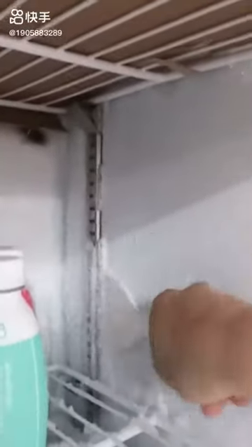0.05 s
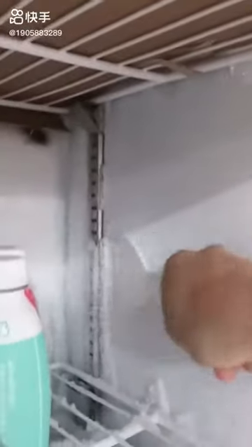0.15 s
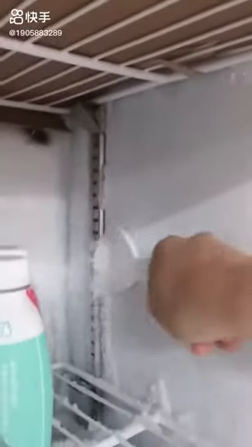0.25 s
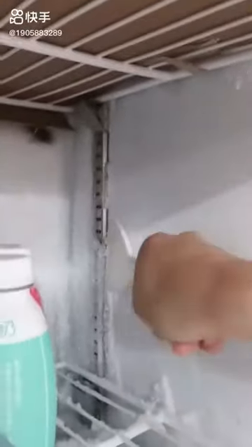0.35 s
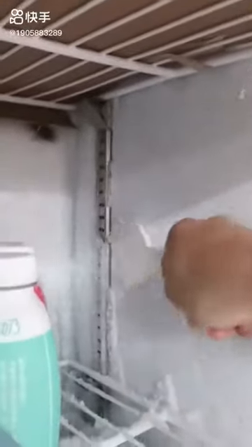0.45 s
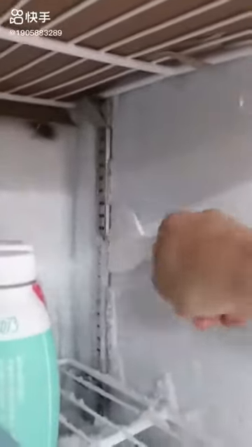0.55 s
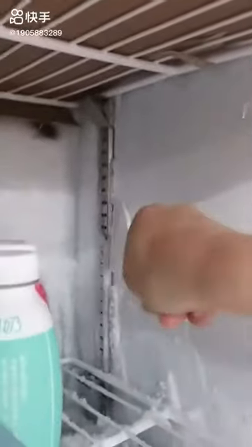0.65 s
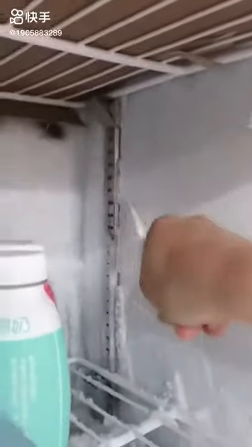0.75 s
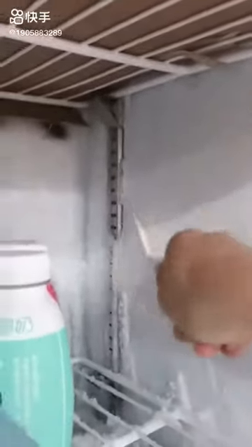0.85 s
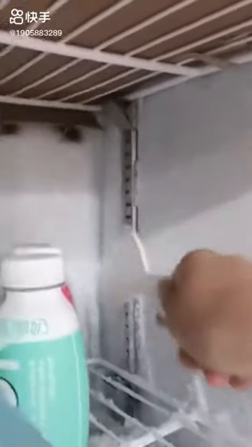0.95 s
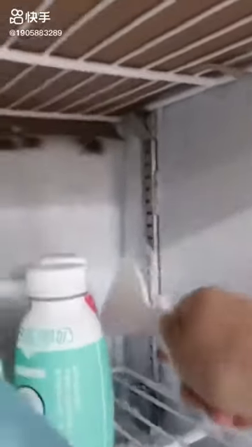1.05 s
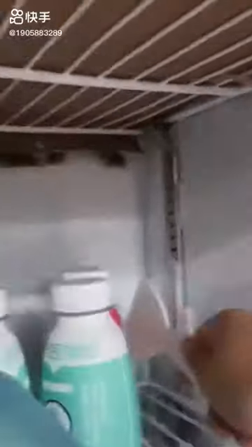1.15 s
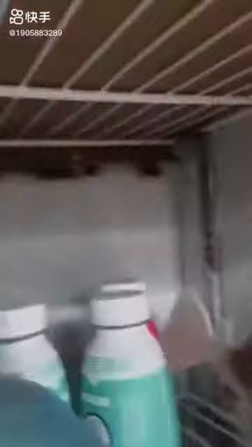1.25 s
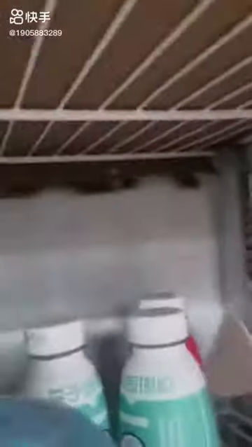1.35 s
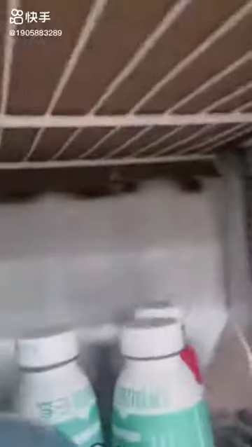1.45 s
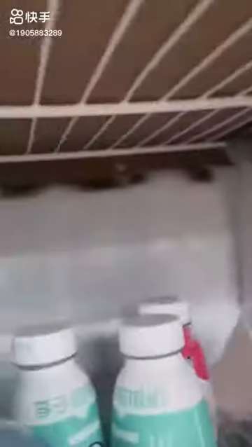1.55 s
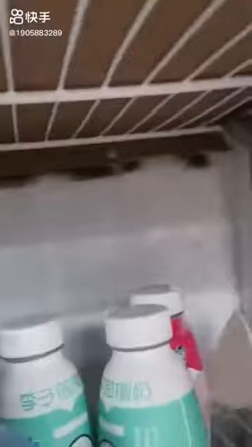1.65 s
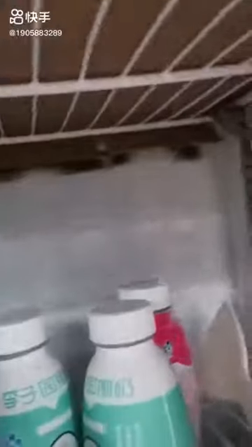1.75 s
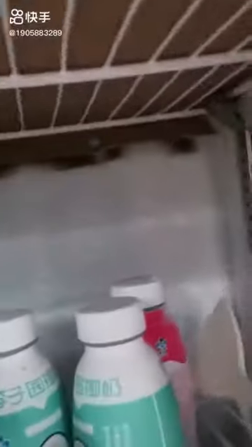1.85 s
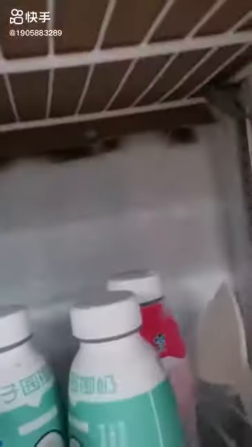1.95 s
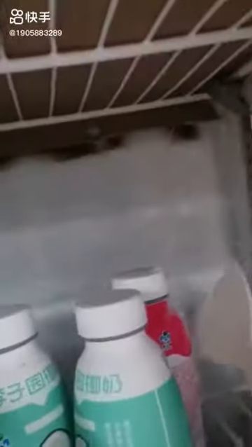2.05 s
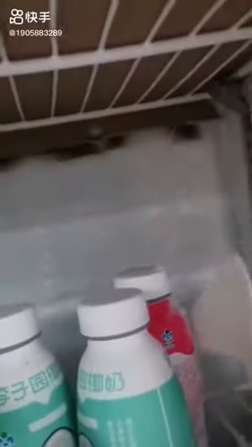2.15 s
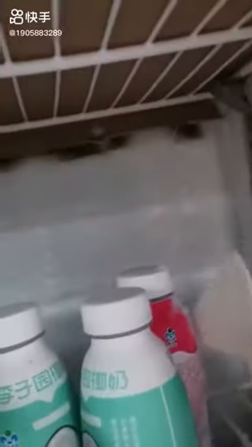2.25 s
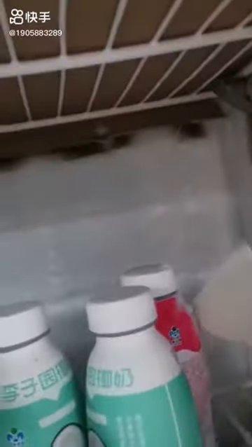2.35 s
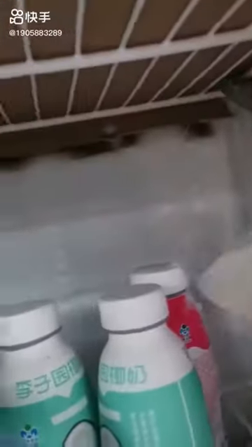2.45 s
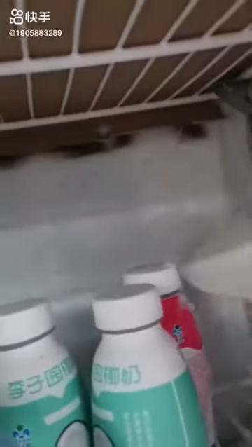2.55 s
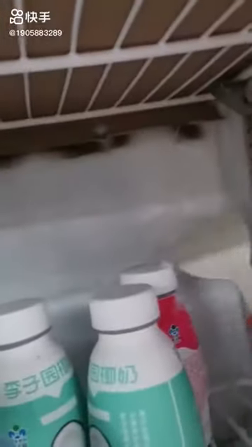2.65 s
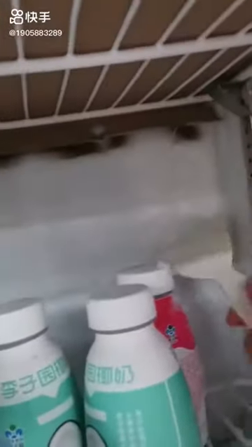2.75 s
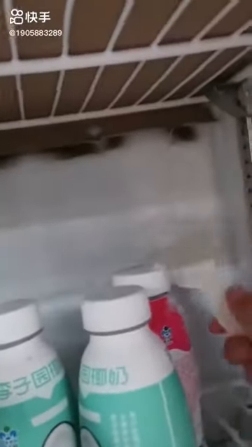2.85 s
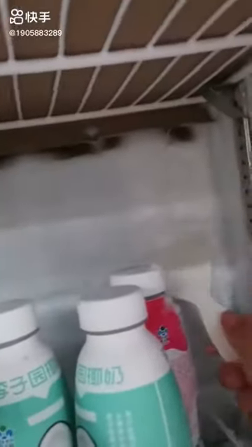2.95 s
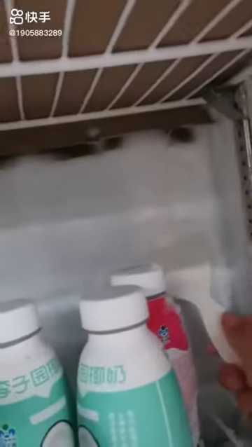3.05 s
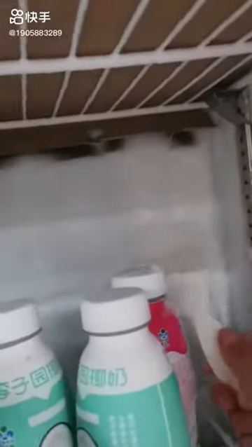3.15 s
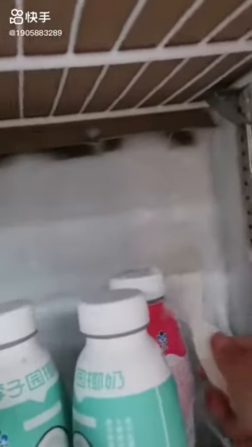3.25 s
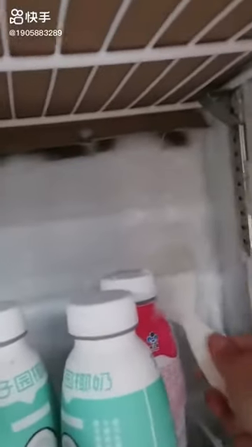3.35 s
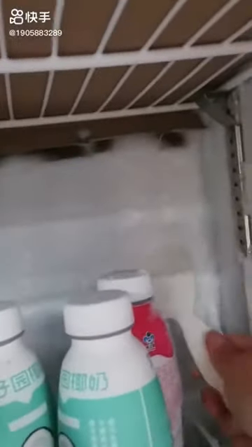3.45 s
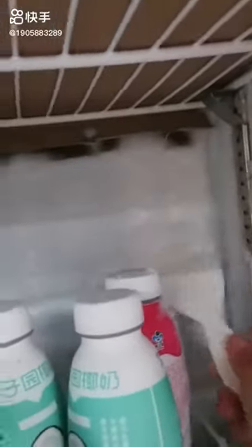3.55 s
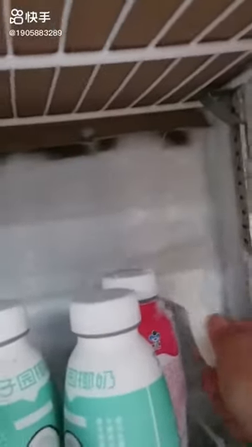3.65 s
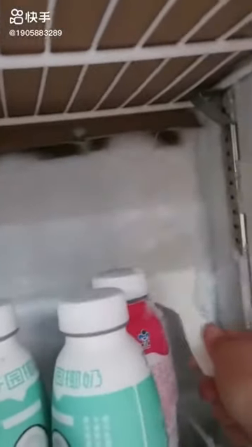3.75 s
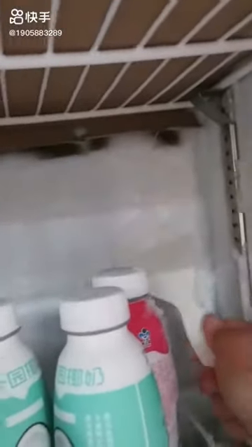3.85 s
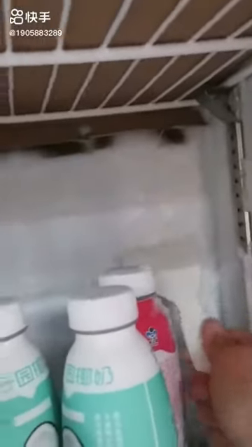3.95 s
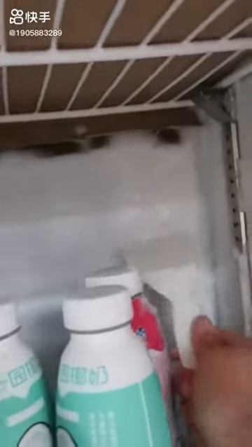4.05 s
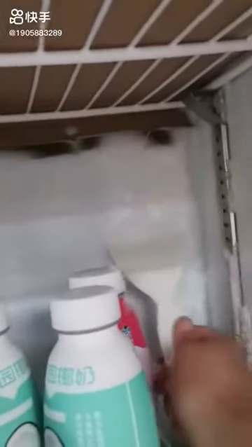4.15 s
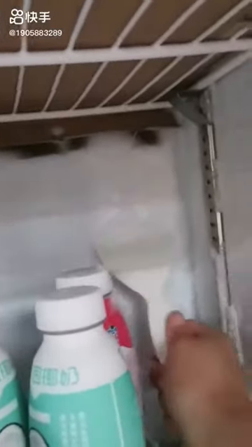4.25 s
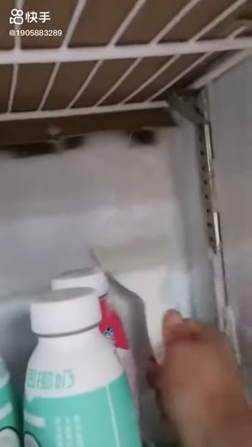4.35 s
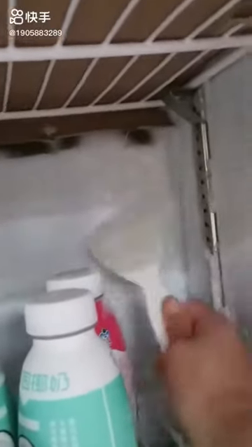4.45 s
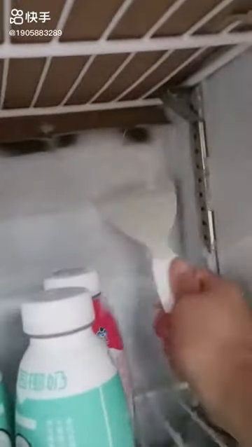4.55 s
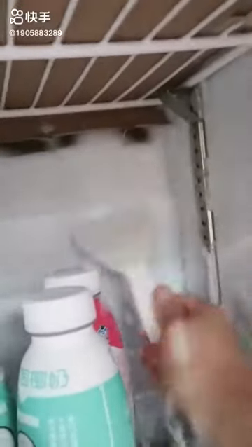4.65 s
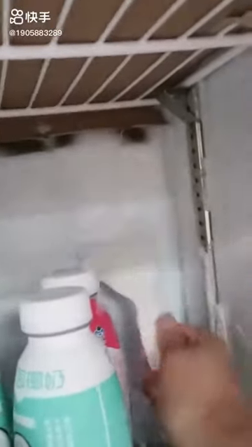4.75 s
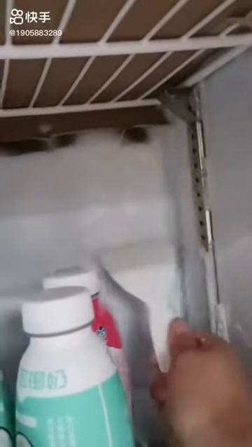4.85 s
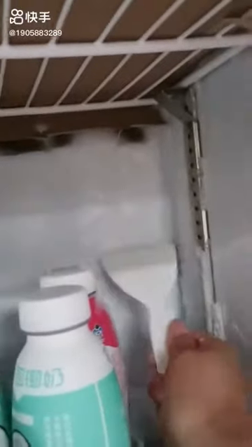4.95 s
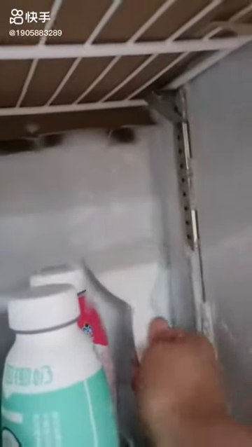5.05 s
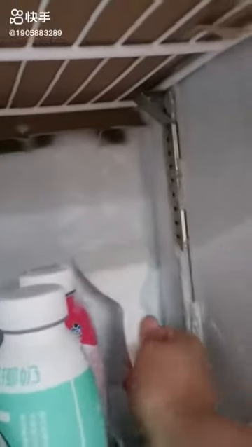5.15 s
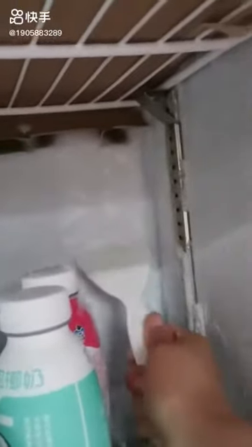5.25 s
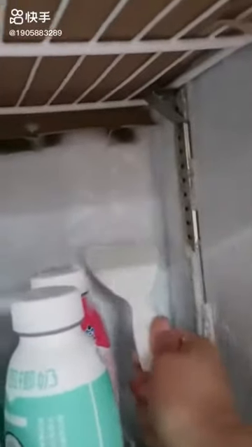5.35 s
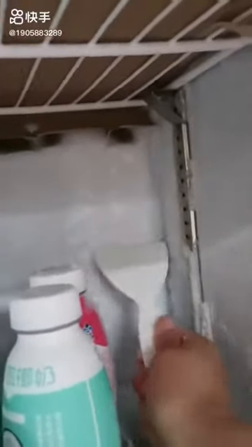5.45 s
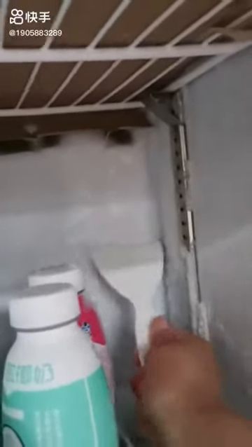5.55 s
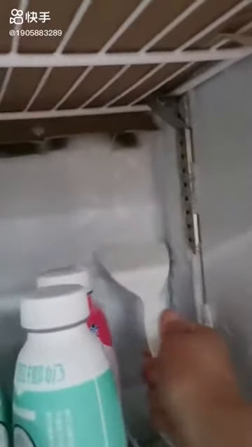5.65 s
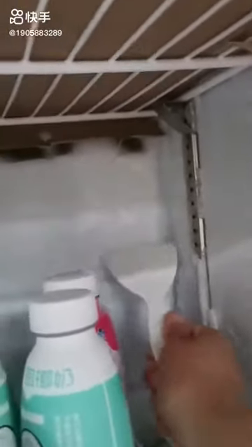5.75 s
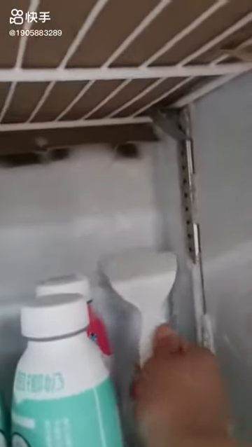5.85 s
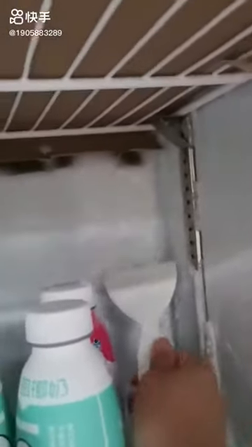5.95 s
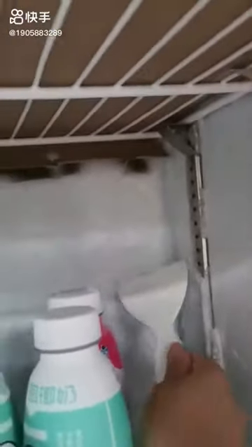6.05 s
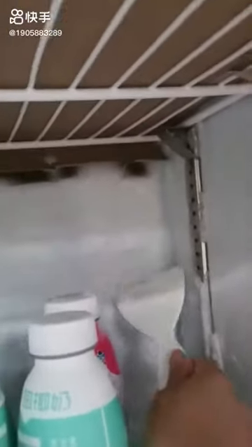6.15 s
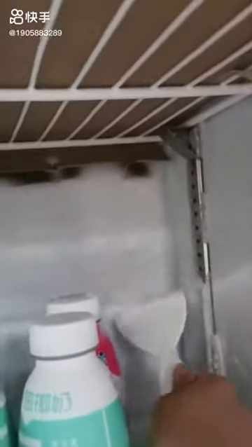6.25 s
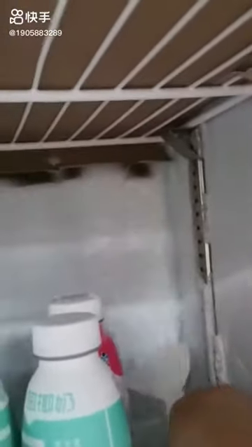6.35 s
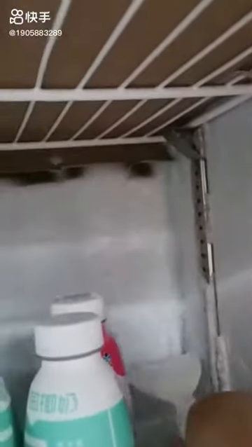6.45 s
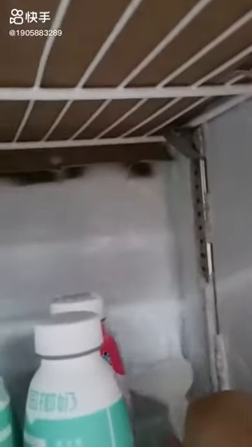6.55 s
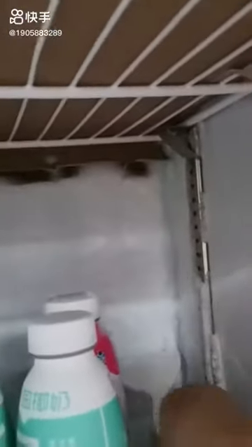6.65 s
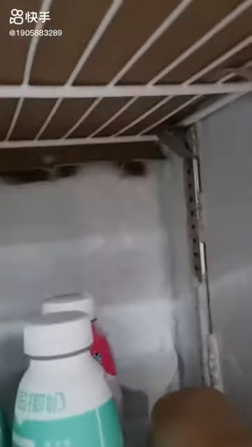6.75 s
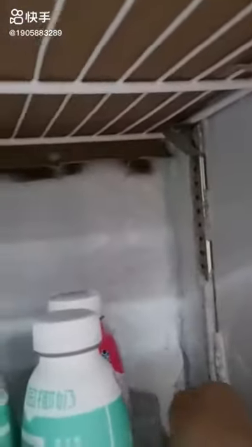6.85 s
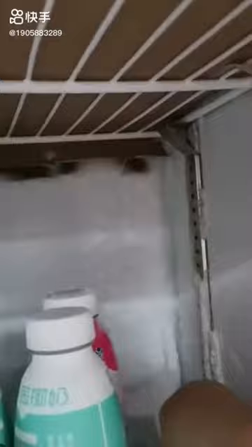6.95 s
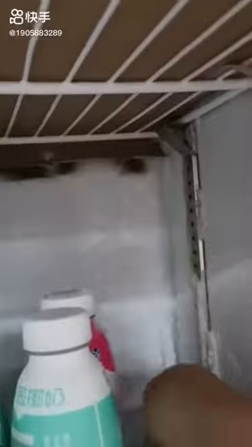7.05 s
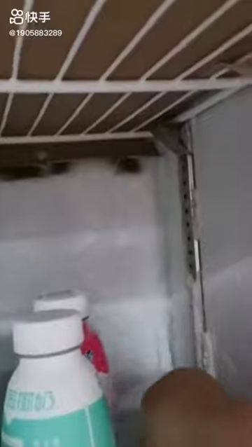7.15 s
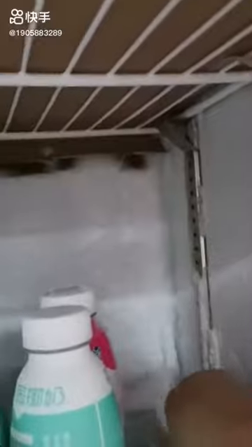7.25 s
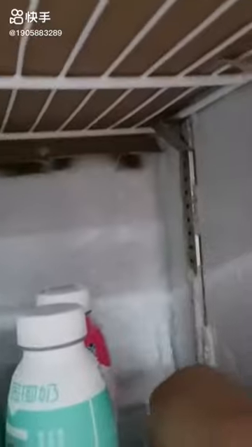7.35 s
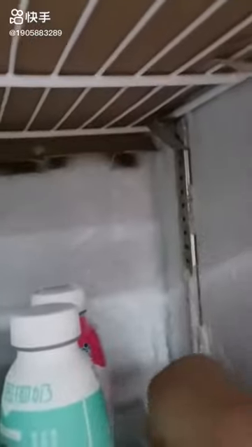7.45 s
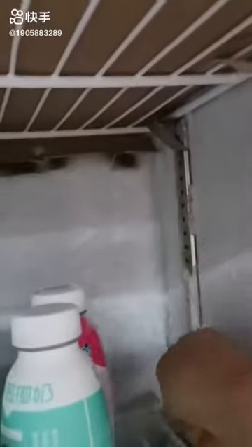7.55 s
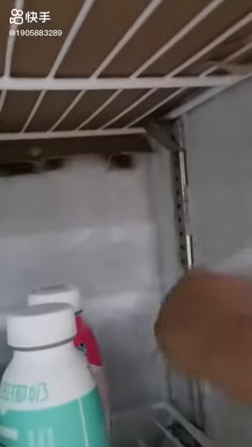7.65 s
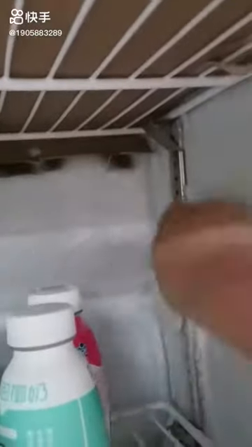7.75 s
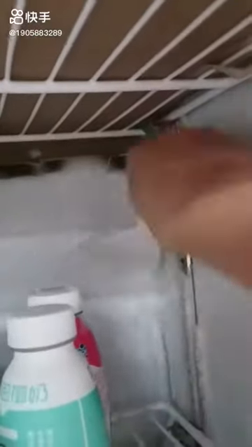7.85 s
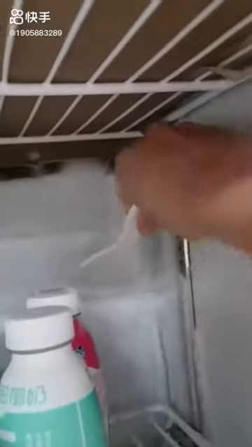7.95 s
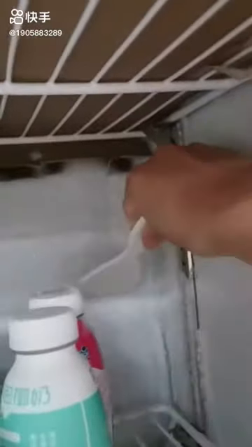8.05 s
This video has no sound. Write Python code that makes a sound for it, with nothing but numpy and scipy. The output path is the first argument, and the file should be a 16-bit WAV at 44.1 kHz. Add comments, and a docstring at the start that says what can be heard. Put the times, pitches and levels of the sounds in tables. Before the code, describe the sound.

Crunchy scraping of ice in a freezer: a short burst, a quiet humming pause, then rapid harsh strokes with cracks, clacks and hollow knocks.

```python
"""A plastic scraper is pushed in quick strokes over thick frost inside a freezer.
Dense random showers of breaking ice crystals excite crackling ice, a ringing blade and a drumming hollow wall.
Lumps snap off in short bursts of cracks, and the blade squeaks where its slips lock to a bending mode.
Hard ridges stop the blade and excite decaying modes of the wall; a short reverberation follows all of these.
Underneath, the compressor hums in beating sine lines, with a rush and a thin hiss of filtered noise."""
import sys
import numpy as np
from scipy import signal
from scipy.fft import rfft, irfft, next_fast_len
from scipy.io import wavfile
from scipy.ndimage import uniform_filter1d, minimum_filter1d

SR = 44100
rng = np.random.default_rng(int(sys.argv[2]) if len(sys.argv) > 2 else 0)


def put_to_file(sound):
    """Save the sound as 16-bit audio at rate SR, in the file named by the first command-line argument."""
    columns = np.atleast_2d(sound).T  # one column per channel
    safe = np.clip(columns, -1, 1)
    whole_steps = np.round(safe * 32767)
    wavfile.write(sys.argv[1], SR, whole_steps.astype(np.int16))


N = 357210
TIME = np.arange(N) / SR  # s

# pushes of the blade: (start [s], length [s], relative level of ice crackle [dB], of blade rasp [dB],
# of wall rumble [dB], swell from start to end [dB], mean pitch of the bent blade [Hz])
PUSHES = [(0.036, 0.18, -18, -26.5, -31, -1.5, 2040), (0.185, 0.06, -13.5, -21.5, -24.5, 0, 2050),
          (0.264, 0.061, -34, -44, -38, -3, 2070), (0.387, 0.048, -20, -25.5, -32.5, 3.5, 1890),
          (0.461, 0.064, -19.5, -24, -26, 17.5, 1900), (0.636, 0.0043, -33.5, -60, -56, -2, 1430),
          (0.781, 0.0062, -28.5, -42.5, -49, -2, 1870), (0.833, 0.026, -44.5, -55.5, -54.5, -4, 1670),
          (1.053, 0.025, -46.5, -43, -53, 4, 1320), (1.1, 0.05, -74, -62, -62, -4, 1110),
          (1.186, 0.014, -72, -58.5, -58, -2, 1020), (1.422, 0.014, -53, -55.5, -57, -1, 1510),
          (1.46, 0.071, -78, -63.5, -63.5, -2, 950), (2.832, 0.052, -21, -18, -20, 4, 1320),
          (2.914, 0.024, -24.5, -24.5, -28, 7, 2100), (3.136, 0.032, -14.5, -14, -23.5, -16.5, 1770),
          (3.178, 0.11, -21.5, -16.5, -17, -1.5, 1630), (3.442, 0.047, -30, -26.5, -40.5, 15, 1530),
          (3.63, 0.047, -22.5, -18.5, -19, -5, 1460), (3.698, 0.019, -30.5, -29.5, -40, 1, 1270),
          (3.861, 0.05, -27, -28.5, -39.5, 8.5, 1380), (4.057, 0.068, -24, -25, -18, -16.5, 1660),
          (4.145, 0.049, -28, -23.5, -20.5, -0.5, 1490), (4.297, 0.056, -56, -56, -55, 3, 1580),
          (4.413, 0.045, -15, -15.5, -15, -0.5, 1530), (4.524, 0.11, -41.5, -55, -65, 14.5, 1500),
          (4.661, 0.062, -19.5, -18.5, -24.5, -1.5, 1460), (4.738, 0.1, -20.5, -28.5, -34, 15.5, 1720),
          (4.876, 0.13, -28.5, -31, -44, -11, 1004), (4.989, 0.08, -25, -16, -16.5, -7.5, 1280),
          (5.069, 0.084, -39.5, -31.5, -31.5, -2.5, 1210), (5.244, 0.004, -28, -18.5, -24, -5, 1880),
          (5.292, 0.012, -16, -20, -35, -9.5, 1370), (5.42, 0.1, -22, -18.5, -17.5, -1.5, 1110),
          (5.563, 0.15, -42, -35, -41, -5, 1640), (5.756, 0.11, -38.5, -35.5, -44.5, -13, 1580),
          (5.884, 0.031, -32, -32.5, -44, 10, 1460), (6.014, 0.0055, -14.5, -14, -25, 0, 1770),
          (6.121, 0.0099, -13, -15, -28.5, -5.5, 1780), (6.16, 0.075, -15.5, -18.5, -26, 6.5, 1570),
          (6.266, 0.075, -15.5, -22.5, -36, -8.5, 1420), (6.394, 0.086, -30.5, -31.5, -42, -4.5, 1750),
          (6.506, 0.047, -32, -40, -57, -4, 2110), (6.586, 0.059, -18, -16.5, -27.5, 5, 1690),
          (6.646, 0.15, -44.5, -29, -28.5, -1.5, 1200), (6.814, 0.035, -21.5, -24, -27.5, 2.5, 1320),
          (6.982, 0.015, -12, -12, -17, 4, 1560), (7.046, 0.004, -15.5, -20, -24, 0, 2240),
          (7.204, 0.072, -28.5, -24.5, -38.5, -3.5, 2000), (7.334, 0.018, -29, -25.5, -27.5, -2, 1600),
          (7.404, 0.043, -30, -36, -35.5, 21.5, 2200), (7.498, 0.17, -16.5, -18.5, -25, -7.5, 1520),
          (7.717, 0.048, -16, -17, -26.5, 2.5, 1910), (7.78, 0.277, -36, -42.5, -52.5, -11.5, 1940),
          (8.076, 0.016, -24.5, -19.5, -23, -1.5, 2080)]
# the largest lumps of ice snapping off: (time [s], relative peak level in the blade [dB],
# crackle relative to the blade before a common trim [dB], pitch of the blade [Hz])
LUMPS = [(0.066, -11.5, 10, 1920.0), (0.11, -19, 13.5, 1500.0), (0.197, 2, 5, 2200),
         (0.205, -11, 19, 1960.0), (0.31, -27.5, 5, 2070), (0.389, -31, -8, 1980), (0.525, 1.5, 0.5, 1880),
         (0.783, -35, 7, 1920), (1.065, -42, 7, 1265), (2.835, 5.5, -5.5, 1540), (2.851, 2.5, -6.5, 1090.0),
         (2.917, -9, -6, 1770.0), (2.934, -7.5, -3.5, 2280.0), (3.136, -14, -18, 1800.0),
         (3.195, 3, -5, 1370), (3.218, 1, -7, 1890), (3.234, 4, -12, 1870), (3.271, -3, -8.5, 2420),
         (3.295, -19, 7, 1980), (3.471, -16, 5.5, 1380), (3.487, -6.5, -7, 1410.0), (3.631, 5.5, -9, 1660),
         (3.654, -2, -11, 1080.0), (4.057, 7.5, -7.5, 940.0), (4.073, 9, -7, 2110),
         (4.152, -8.5, -18, 2140.0), (4.41, -1, -9, 1480), (4.451, -7.5, 3, 2010.0),
         (4.676, -10.5, 2, 1450), (4.698, 2.5, -0.5, 1330), (4.755, -26, 13.5, 1630), (4.804, -11, -5, 960),
         (4.824, -8.5, -12, 2030), (4.833, -9.5, -5, 2050.0), (4.96, -26, 12.5, 1680),
         (4.998, -1.5, -4.5, 1900.0), (5.01, -3.0, -8.5, 1200), (5.061, -3.5, -7.5, 950),
         (5.244, 0.5, -21.5, 1680), (5.29, -8, -2, 1380), (5.346, -23.5, -1.5, 1400.0),
         (5.416, -7.5, -10, 930), (5.446, 1, -10, 930), (5.475, 0.5, -4.5, 890), (5.498, -4.5, -4.5, 2120),
         (5.517, 2, -11, 1890), (5.637, -18, -3, 1780), (5.685, -17.0, -5, 1470), (5.763, -12, 0, 2560),
         (5.911, -16.5, -7, 1100), (6.167, -13, 7.5, 1280), (6.213, -5.5, -5, 1280), (6.334, -4, -8, 1450),
         (6.398, -6.5, -8, 2280), (6.429, -10.5, -7, 2600), (6.463, -17.5, 3, 1460), (6.588, -1, 5, 1340),
         (6.637, 6, -7, 1140.0), (6.684, -2.5, -15.0, 1110), (6.817, -4.5, -4.0, 1370),
         (6.963, -10.5, -5, 1930), (6.986, -1.5, -1.5, 2100), (7.047, -11.5, 6, 2230.0),
         (7.214, -11, -15, 2030), (7.341, -17, -10, 2200), (7.445, -3, -2, 2140), (7.495, -8.5, -7, 1510.0),
         (7.519, -10.5, 7, 2230), (7.542, 7, 0, 1400.0), (7.723, -5.5, -6.5, 2660.0),
         (7.755, -6.5, -1.5, 1750), (7.849, -11.5, -6.5, 2560.0), (7.919, -21, -2.5, 2130)]
FIRM_DB = -21  # level of a firm push


def from_db(db):
    """Level in decibels to amplitude ratio."""
    return 10 ** (np.asarray(db) / 20)


def rms_one(x):
    """Normalise the effective value to 1."""
    return x / np.sqrt(np.mean(x ** 2) + 1e-20)


def peak_one(x):
    """Normalise the peak to 1."""
    return x / (np.abs(x).max() + 1e-20)


def add(out, s, x):
    """Superpose x on out from time s."""
    i = max(0, round(s * SR))
    out[i:i + len(x)] += x[:max(0, len(out) - i)]


def drift(rate, size):
    """Slow random modulation: straight lines between normal random values drawn rate times a second."""
    knots = rng.standard_normal(4096)
    return np.interp(TIME[:size] * rate, np.arange(len(knots)), knots)


def colour(x, spectrum):
    """Minimum-phase filtering: the folded cepstrum gives the causal response of a given gain curve."""
    size = 2 * next_fast_len(len(x))
    hz, db = np.transpose(spectrum)
    grid = np.maximum(np.arange(size // 2 + 1) * SR / size, 1)
    octaves_outside = np.abs(np.log2(grid / np.clip(grid, hz[0], hz[-1])))
    gain_db = np.interp(np.log(grid), np.log(hz), db) - 40 * octaves_outside
    cepstrum = irfft(np.log(from_db(np.maximum(gain_db, -100))))
    cepstrum[1:size // 2] *= 2
    cepstrum[size // 2 + 1:] = 0
    response = np.exp(rfft(cepstrum))
    return irfft(rfft(x, size) * response)[:len(x)]


def level_to(x, db, even_s):
    """Envelope control: bring the slow level onto a dB curve while the fine grain stays."""
    width = max(8, int(even_s * SR))
    power = uniform_filter1d(uniform_filter1d(x ** 2, width), width)
    return (x / np.sqrt(np.abs(power) + 1e-12))[:len(db)] * from_db(db)


def scraping():
    """Stick-slip friction: one shower of fractures excites ice, blade and wall together."""
    ice_column, blade_column, wall_column = np.transpose(PUSHES)[2:5]
    ice_db = stroke_level(ice_column, release_s=.051, brush_db=-16, trail_s=.193)
    blade_db = stroke_level(blade_column, release_s=0.065, brush_db=-17, trail_s=0.28)
    wall_db = stroke_level(wall_column, release_s=0.094, brush_db=-15, trail_s=0.45)
    wall_lag_s = .003  # the level of the wall follows a little after the edge
    wall_db = np.interp(TIME - wall_lag_s, TIME, wall_db)
    edge_db = np.maximum(ice_db, blade_db)
    bend_hz = blade_pitch()

    bite = from_db(.45 * np.clip(edge_db - FIRM_DB, -20, 6))  # a deep bite breaks more crystals a second
    slip = from_db(4.0 * drift(rate=150, size=N))
    clicks = slip * fractures(N, per_s=4200 * bite, spread_db=4.0)

    bass_db = 0.4 * np.clip(wall_db - blade_db + 0.5, -18, 6)  # leaning on the wall rather than skimming it
    crackle = level_to(sparkle(ice(clicks)[:N], ice_db), ice_db + 0.22, even_s=0.025)
    rasp = level_to(blade(clicks, bend_hz), blade_db + 0.19, even_s=0.015)
    rumble = level_to(wall(clicks, bass_db), wall_db + 0.4, even_s=0.0275)

    contact = from_db(skipping(edge_db))
    steady = (crackle + rasp) * contact + rumble + chips(ice_db, blade_db, bend_hz)
    return steady * from_db(free_of_snaps())


def stroke_level(column, release_s, brush_db, trail_s):
    """Exponential attack and decay: the edge bites, swells or tires and lets go, amid a softer brushing."""
    bite_s, touch_s = .02, .112  # rise through 60 dB of the biting edge and of the brushing
    t = TIME[::20]
    power = np.full(len(t), 1e-12)
    for (start, length, *_, swell_db, hz), db in zip(PUSHES, column):
        before = np.maximum(start - t, 0)
        after = np.maximum(t - start - length, 0)
        progress = np.clip((t - start) / (length + 1e-6), 0, 1)
        held_db = db + swell_db * (progress - .5)
        bite = from_db(held_db - 60 * (before / bite_s + after / release_s))
        brush = from_db(held_db + brush_db - 60 * (before / touch_s + after / trail_s))
        power += bite ** 2 + brush ** 2
    return np.interp(TIME, t, 10 * np.log10(power))


def blade_pitch(wander=0.024):
    """Bending stiffness: each push bends the blade to its own pitch, which wanders with the contact."""
    held = []
    for start, length, *_, hz in PUSHES:
        held += [(start, hz), (start + length, hz)]
    return np.interp(TIME, *np.transpose(held)) * (1 + wander * drift(rate=34, size=N))


def fractures(size, per_s, spread_db):
    """Random impulse process: crystals break at chance moments, many small and a few large."""
    strength = from_db(spread_db * np.minimum(rng.exponential(1, size), 4.5))
    sign = rng.choice([-1, 1], size)
    return strength * sign * (rng.random(size) < per_s / SR)


def body(clicks, spectrum, mode_hz, mode_db, mode_q, ring_t60, direct, hop_s=.025, size=3000):
    """Modal response: each spot along the contact rings with its own crowd of modes, one standing out."""
    hop = int(hop_s * SR)
    out = np.zeros(hop + len(clicks) + size)
    padded = np.pad(clicks, (hop, 2 * hop))
    for i in range(0, len(clicks) + hop, hop):
        piece = padded[i:i + 2 * hop] * np.hanning(2 * hop)  # overlapping pieces crossfade
        ring = rng.standard_normal(size) * from_db(-60 * TIME[:size] / ring_t60)  # a crowd of modes
        ring[0] += direct * np.linalg.norm(ring)  # the immediate click
        b, a = signal.iirpeak(mode_hz[min(i, len(clicks) - 1)], mode_q, fs=SR)
        ring = rms_one(ring + from_db(mode_db) * signal.lfilter(b, a, ring))
        add(out, i / SR, signal.fftconvolve(piece, ring))
    return colour(out[hop:], spectrum)


def ice(clicks):
    """Heavily damped resonance: bright and very short, with a wandering zing from the blade's thin edge."""
    # colour of the ice: (frequency [Hz], gain [dB])
    ice_spectrum = [(1760, -31.5), (3000, -14.5), (3810, -14.5), (4380, -14.5), (4970, -13), (5600, -10.5),
                    (6040, -11), (8170, -2), (10000, -15), (13200, -14.5), (14900, -16.5), (15700, -15.5),
                    (16000, -29.5)]
    edge_hz = 8200 * (1 + 0.022 * drift(rate=6.0, size=len(clicks)))
    return body(clicks, ice_spectrum, edge_hz, mode_db=-10.5, mode_q=18, ring_t60=0.037, direct=0.51)


def blade(clicks, bend_hz):
    """Bending vibration of a plate: the plastic rings briefly, its main mode set by pressure and contact."""
    # colour of the blade: (frequency [Hz], gain [dB])
    blade_spectrum = [(440, -25.5), (750, -9), (838, -15), (923, -3.5), (1280, -3.5), (1410, -2),
                      (1680, -4), (1860, -4), (2190, -3), (2910, -9), (3420, -13), (3710, -18),
                      (4400, -11.5), (5720, -31.5), (9680, -120)]
    return body(clicks, blade_spectrum, bend_hz, mode_db=7, mode_q=11, ring_t60=0.031, direct=0.52)


def wall(clicks, bass_db, t60=0.16, split_hz=340, size=9000):
    """Panel resonance: the hollow liner drums, and firm pushes drive its lowest modes more strongly."""
    # colour of the wall: (frequency [Hz], gain [dB])
    wall_spectrum = [(76, -28), (130, -8), (151, -6.5), (182, -11.5), (217, -2), (253, -11), (297, -7.5),
                     (329, -10), (384, -8), (461, 1.5), (526, -4), (578, 2.5), (651, -13), (850, -12),
                     (1100, -63), (1870, -120)]
    ring = rng.standard_normal(size) * from_db(-60 * TIME[:size] / t60)
    drum = colour(signal.fftconvolve(clicks, ring), wall_spectrum)[:N]
    low = signal.sosfilt(signal.butter(4, split_hz, "low", fs=SR, output="sos"), drum)
    high = signal.sosfilt(signal.butter(4, split_hz, "high", fs=SR, output="sos"), drum)
    return high + low * from_db(bass_db)


def sparkle(crackle, ice_db, split_hz=8800, per_db=.16, firm_gain_db=1.5):
    """Fracture size sets the spectrum: a deeper bite shatters finer crystals and lifts the treble."""
    top = signal.sosfiltfilt(signal.butter(2, split_hz, "high", fs=SR, output="sos"), crackle)
    lift_db = firm_gain_db + per_db * np.clip(ice_db - FIRM_DB, -20, 8)
    return crackle + top * (from_db(lift_db) - 1)


def skipping(stroke_db, brushing_db=-52):
    """Contact modulation in dB: a lightly held edge skips, but not under a firm push or in mere brushing."""
    skip_db, skips_per_s = 1.5, 62
    lightness = np.clip(np.minimum(FIRM_DB - stroke_db, stroke_db - brushing_db) / 10, 0, 1)
    return skip_db * lightness * drift(rate=skips_per_s, size=N)


def chips(ice_db, blade_db, bend_hz, count=170):
    """Random brittle fracture: small lumps break off by chance, about as strong as the push that frees them."""
    follows = .93  # share of the push's level that a chip follows
    chip_db, spread_db = 8.5, 3  # peak over that level, and its random spread
    out = np.zeros(N)
    for place, deviation in zip(rng.random(count), rng.standard_normal(count)):
        i = int(place * N)
        push_db = np.array([blade_db[i], ice_db[i]])
        peaks_db = FIRM_DB + follows * (push_db - FIRM_DB) + chip_db + spread_db * deviation
        clack_db, crack_db = peaks_db
        add(out, i / SR, lump(clack_db, crack_db, bend_hz[i]))
    return out


def free_of_snaps(width_s=0.018, depth_db=-5):
    """Interrupted friction, a dip in dB: the edge catches before a lump snaps and jumps clear after it."""
    nearness = np.zeros(N)
    for s, *_ in LUMPS:
        add(nearness, s - width_s, np.hanning(int(2 * width_s * SR)))
    return depth_db * np.minimum(nearness, 1)


def snaps(clack_db=-1.93, crack_db=2.0):
    """Sudden release of stress: each large lump gives a clack of the blade and a crack of the ice."""
    out = np.zeros(N)
    for s, db, crackle_db, bend_hz in LUMPS:
        add(out, s, lump(db + clack_db, db + crackle_db + crack_db, bend_hz))
    return out


def lump(blade_db, ice_db, bend_hz, swell_s=.0008, crumble_t60=.014, size=2000):
    """Cascading fracture: a lump gives way in a tight burst of cracks and crumbles within milliseconds."""
    t = TIME[:size]
    envelope = (1 - np.exp(-t / swell_s)) * from_db(-60 * t / crumble_t60)
    burst = fractures(size, per_s=7000, spread_db=2.5) * envelope
    clack = from_db(blade_db) * peak_one(blade(burst, np.full(size, bend_hz)))
    crack = from_db(ice_db) * peak_one(ice(burst))
    return clack + crack


def squeaks(jitter=0.015, rough_db=2.0):
    """Mode-locked stick-slip: for a moment the slips lock to a bending mode and give a rough tone."""
    # juddering edge: (start [s], length [s], pitch [Hz], relative level [dB])
    squeak_tones = [(0.386, 0.043, 1890, -21), (4.874, 0.032, 1013, -24), (6.107, 0.034, 1903, -19.5),
                    (6.256, 0.064, 1430, -15.5), (6.831, 0.033, 1406, -17.5), (7.213, 0.019, 2045, -18),
                    (7.545, 0.024, 1416, -18.5), (7.609, 0.031, 1425, -16)]
    out = np.zeros(N)
    for s, length, hz, db in squeak_tones:
        size = int(length * SR)
        phase = 2 * np.pi * np.cumsum(hz * (1 + jitter * drift(rate=300, size=size))) / SR
        swell = signal.windows.tukey(size) * from_db(db - 2.5 + rough_db * drift(rate=200, size=size))
        add(out, s, np.sqrt(2) * np.sin(phase) * swell)
    return out


def jolts():
    """Impact excitation: hard stops of the blade knock on the liner and set the whole panel booming."""
    # blade ramming a ridge: (time [s], relative peak level of the knock [dB],
    # boom relative to the knock before a common trim [dB])
    ridge_hits = [(0.508, -14, 1), (0.525, 0.5, -22), (2.836, 2.5, -26), (2.871, -3, -28),
                  (3.222, -2, -13.5), (3.271, 0, -22), (3.487, -12, -25), (3.634, 4, -21.5),
                  (3.654, -9, -7.5), (4.052, 2, -20), (4.151, 0, -16.5), (4.437, -7, -11),
                  (5.011, 3.5, -20.5), (5.03, 1.5, -21), (5.058, -2.5, -12), (5.446, 0, -20),
                  (5.477, -1, -18.5), (5.518, -4.5, -11.5), (5.673, -11.5, -21), (6.636, 8.5, -28),
                  (6.684, -1.5, -18.5), (6.986, -3.5, -19), (7.014, -9.5, -10), (7.647, -23.5, 10)]
    # upper and lower modes of the hollow wall: (nominal frequency [Hz], relative level [dB], T60 [s])
    knock_modes = [(356, -11, .07), (434, -3, 0.051), (461.4, -3, 0.083), (490.3, 3.5, 0.059),
                   (520, -9, 0.037), (589.2, 1.5, 0.087), (648, -4.5, 0.036), (794, -5.5, 0.034),
                   (899, -7, 0.044), (1053, -10, 0.038)]
    boom_modes = [(57.9, -22, 0.11), (91, -9.5, 0.14), (125.6, -4, 0.14), (144.6, -2.5, 0.22),
                  (165.4, 1.5, 0.099), (201, 2, 0.11), (226, -1, 0.17), (276.3, -8.5, 0.18),
                  (316, -10.5, 0.23)]
    out = np.zeros(N)
    for s, db, boom_db in ridge_hits:
        knock = wall_ring(knock_modes, rise_s=0.0012, scatter_db=3.5)
        boom = wall_ring(boom_modes, rise_s=0.0054, scatter_db=2.0)
        add(out, s, from_db(db - 3.0) * (knock + from_db(boom_db + 7.5) * boom))
    return out


def wall_ring(modes, rise_s, scatter_db, detune=0.036, size=16000):
    """Modal superposition: each blow weights the modes anew; slow bending waves make low ones swell later."""
    hz, db, t60 = np.transpose(modes)[:, :, None]
    t = TIME[:size]
    weight, shift, phase = rng.standard_normal((3, len(hz), 1))
    swell = 1 - np.exp(-(t / rise_s * hz / hz.mean()) ** 2)
    waves = np.sin(2 * np.pi * (hz * (1 + detune * shift) * t + phase))
    decay = from_db(db + scatter_db * weight - 60 * t / t60)
    return peak_one(np.sum(waves * swell * decay, axis=0))


def cabinet(x, t60=0.31, wet_db=-22, dull_hz=2500, size=14000):
    """Diffuse reverberation: the small compartment adds a short, dull, exponentially decaying tail."""
    tail = rng.standard_normal(size) * from_db(-60 * TIME[:size] / t60)
    tail /= np.linalg.norm(tail)
    tail = signal.sosfilt(signal.butter(1, dull_hz, fs=SR, output="sos"), tail)
    return x + from_db(wet_db) * signal.fftconvolve(x, tail)[:N]


def compressor():
    """Running machinery: a throbbing hum, the rush and hiss of the cooling circuit, and faint air noise."""
    air = from_db(-78.0) * rms_one(signal.lfilter([1], [1, -.6], rng.standard_normal(N)))
    return motor_hum() + cooling_rush() + cooling_hiss() + air


def motor_hum():
    """Beating: compressor and fan motors at nearly the same speed give close, unsteady sine lines."""
    # lines of the motors: (frequency [Hz], mean level relative to the level curve [dB])
    hum_lines = [(48.6, -19.5), (97.5, -3.5), (100, 1.5), (105, 1.5), (146.2, -1.5), (199.5, -8),
                 (243, -12), (436, -13.5)]
    # rise and fall of the hum: (time [s], level [dB])
    hum_level = [(0, -44.5), (.7, -49), (1.25, -59.5), (1.7, -52.5), (2.4, -52), (3.0, -47.5), (3.9, -42.5),
                 (4.6, -48), (5.4, -44), (6.2, -44.5), (7.1, -47.5), (8.1, -46.5)]
    hum = np.zeros(N)
    for hz, db in hum_lines:
        phase = 2 * np.pi * (hz * TIME + rng.random()) + .25 * drift(rate=14, size=N)
        hum += np.sqrt(2) * np.sin(phase) * from_db(db + 2 * drift(rate=21, size=N))
    return hum * from_db(np.interp(TIME, *np.transpose(hum_level)))


def cooling_rush():
    """Flow noise: the running cooling circuit colours broadband noise into a soft rush."""
    # colour of the rush: (frequency [Hz], relative gain [dB])
    rush_spectrum = [(18, -55), (30, -21), (69, -21), (83, -13.5), (103, -3.5), (157, -14.5), (171, -27.5),
                     (188, -7.5), (247, -21), (270, -22), (433, -16), (622, -31), (2300, -39),
                     (2990, -73.5), (5060, -120)]
    return from_db(-52) * rms_one(colour(rng.standard_normal(N), rush_spectrum))


def cooling_hiss():
    """Narrow-band noise: resonances, each filtered twice, whistle thinly as the level swells and sinks."""
    # bands of the hiss: (frequency [Hz], width of one filter pass [Hz], level relative to the curve [dB])
    hiss_bands = [(2680, 26, 1), (2776, 520, -0.5), (3014, 14, -8), (7360, 30, -10.5), (7620, 30, -9),
                  (7720, 650, -4)]
    # rise and fall of the hiss: (time [s], level [dB])
    hiss_swell = [(.9, -76), (1.55, -76.5), (1.85, -68), (2.08, -75.5), (2.25, -70.5), (2.62, -68),
                  (2.8, -78)]
    level_db = np.interp(TIME, *np.transpose(hiss_swell))
    hiss = np.zeros(N)
    for hz, width, db in hiss_bands:
        b, a = signal.iirpeak(hz, hz / width, fs=SR)
        once = signal.lfilter(b, a, rng.standard_normal(N))
        hiss += from_db(level_db + db) * rms_one(signal.lfilter(b, a, once))
    return hiss


def scene():
    """Superposition: the scraper's sounds reverberate in the compartment, and the compressor is added."""
    scraper = scraping() + snaps() + squeaks() + jolts()
    return (cabinet(scraper) + compressor())[None]


def record(dry, size=56):
    """Peak limiting and band limiting: a fast gain dip holds the loudest cracks, then the top is cut."""
    allowed = .95 / np.maximum(np.abs(dry), .95)
    gain = uniform_filter1d(minimum_filter1d(allowed, size), size)
    top_cut = signal.ellip(12, .2, 85, 15800, fs=SR, output="sos")  # low-pass at 15800 Hz
    return signal.sosfilt(top_cut, dry * gain)


dry = scene()
out = record(dry)
put_to_file(out)
```